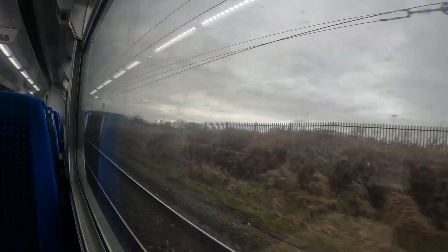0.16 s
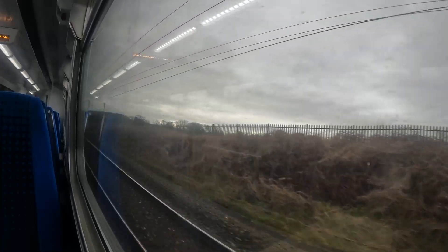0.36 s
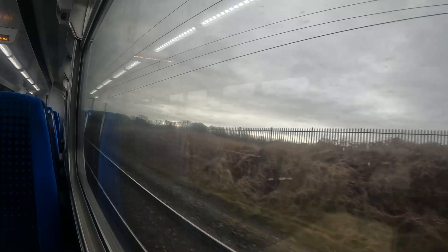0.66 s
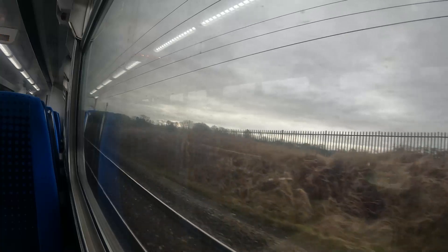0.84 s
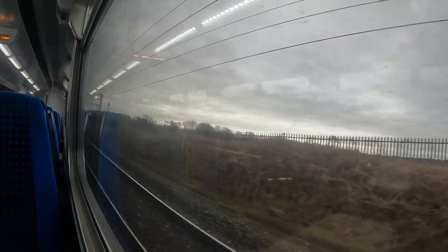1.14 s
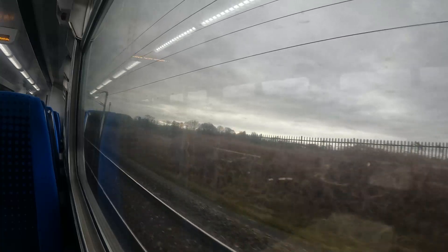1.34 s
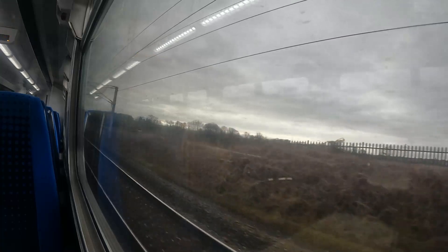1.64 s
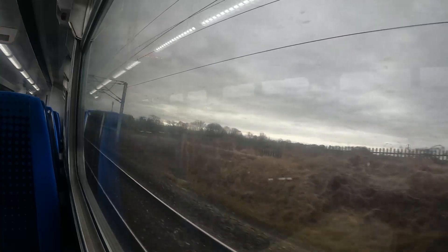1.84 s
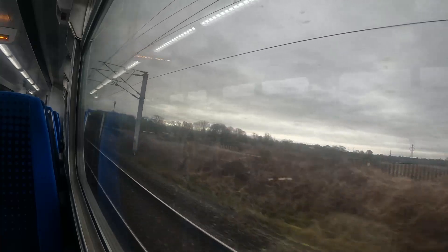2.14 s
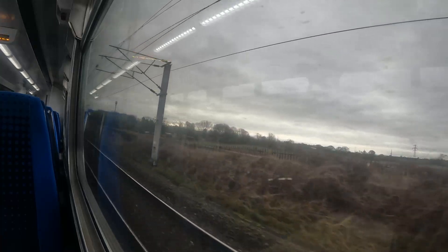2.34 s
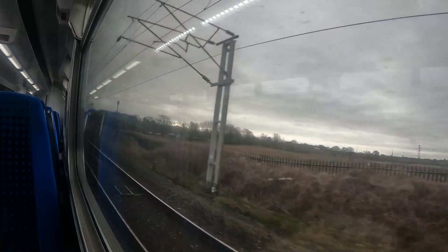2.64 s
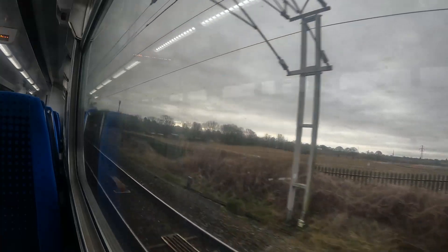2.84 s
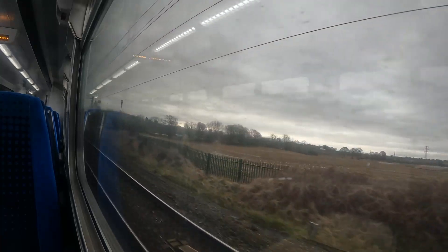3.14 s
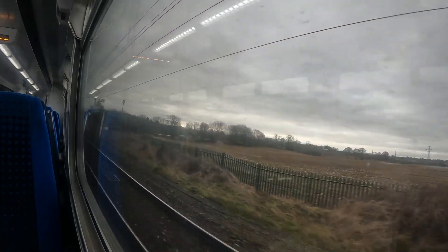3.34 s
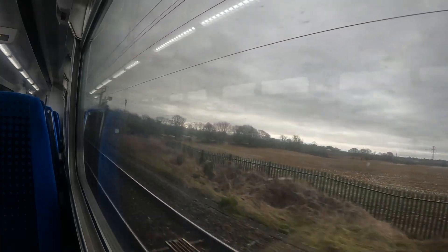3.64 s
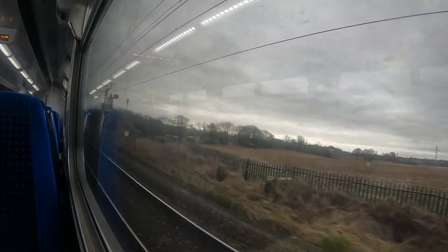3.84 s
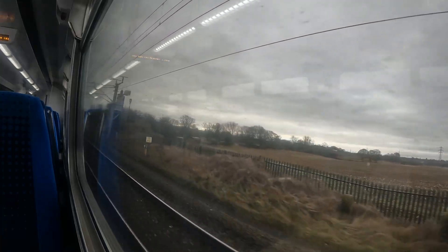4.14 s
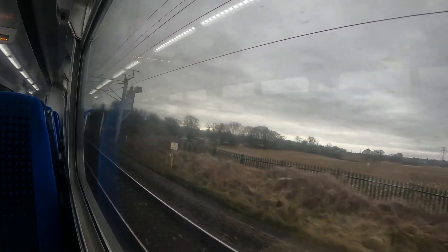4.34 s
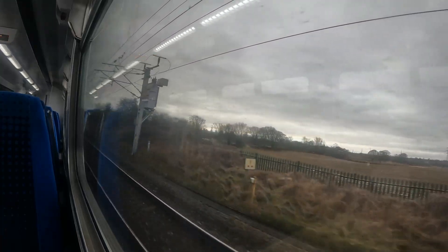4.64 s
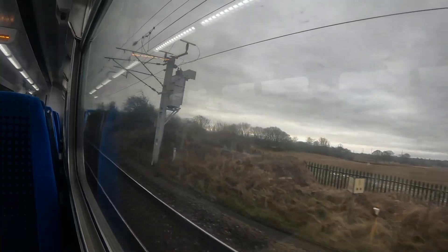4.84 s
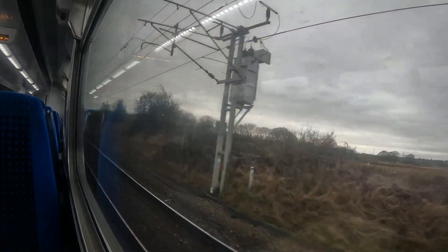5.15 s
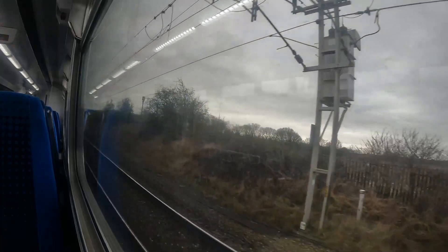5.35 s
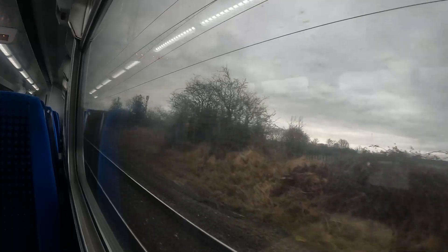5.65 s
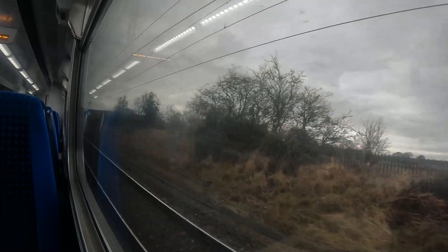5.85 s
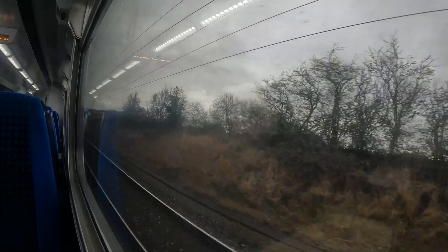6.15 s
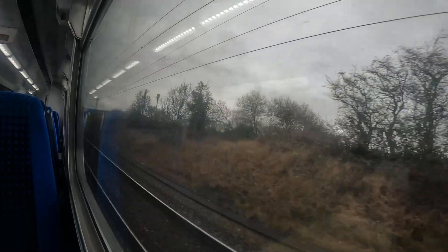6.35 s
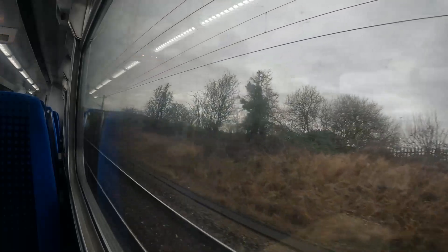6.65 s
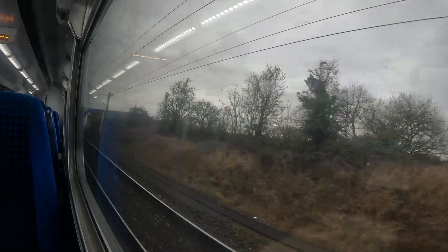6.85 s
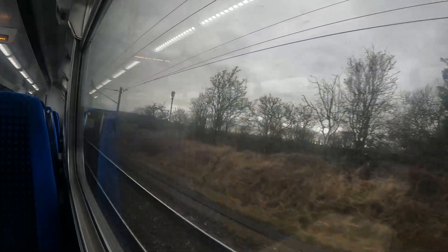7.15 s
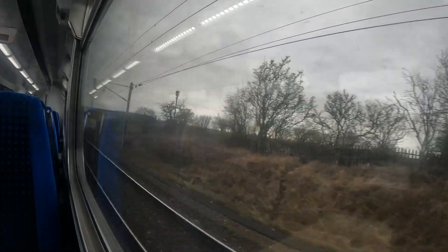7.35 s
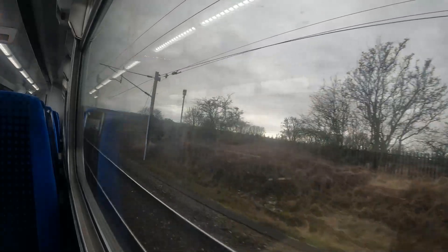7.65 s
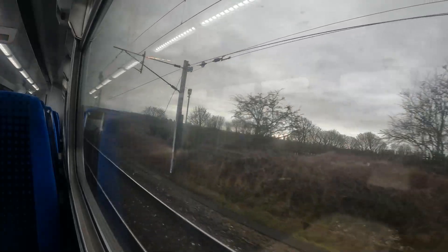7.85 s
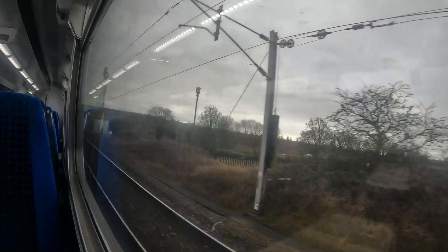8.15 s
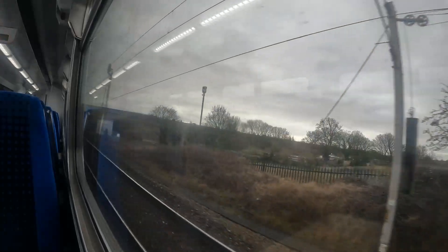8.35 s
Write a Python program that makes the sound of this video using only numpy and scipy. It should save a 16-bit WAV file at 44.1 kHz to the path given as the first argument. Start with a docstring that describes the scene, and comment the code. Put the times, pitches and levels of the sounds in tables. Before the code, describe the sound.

Interior of a moving diesel train. A loud, low, buzzing underfloor engine drone dominates, with a fast throb over dull wheel rumble, muffled rolling roar and very faint draught hiss. About halfway the revs slide down at a gear change and the drone becomes a slower, pulsing, booming beat that lasts to the end. Microphone at a passenger seat, engine nearly central, dull enclosed sound.

```python
"""Diesel railcar at speed, heard inside

The six-cylinder engine under the floor knocks the body into its low modes; at a gear change the revs fall
by a third, so the fast throb turns into a slower beat. Firings are clicks into resonators; pure engine notes
and an axle hum are sines. Filtered noise gives the rumble, roar and the hiss of draught and loose trim, which
buzzes with the drone; wavering sines are the faint tones of wheels, gears and fans."""
import sys
import numpy as np
from scipy import signal
from scipy.io import wavfile

SR = 44100
rng = np.random.default_rng(int(sys.argv[2]) if len(sys.argv) > 2 else 0)


def bounce(signal):
    """Save signal as a 16-bit WAV file at the path given by the first command-line argument."""
    frames = np.transpose(np.atleast_2d(signal))
    limited = np.clip(frames, -1, 1)
    pcm = np.round(limited * 32767).astype(np.int16)
    wavfile.write(sys.argv[1], SR, pcm)


N = 374409
T_S = np.arange(N) / SR
LEFT_RIGHT = np.array([[1], [-1]])
SPEED_GAIN_PER_S = .005026   # share of the starting speed gained every second
# engine rate in four-stroke cycles (two crank turns) per second, around the gear change
HIGH_CYCLES_HZ, LOW_CYCLES_HZ, CREEP_HZ_PER_S = 16.0979, 10.525, .0675
SHIFT_S, SHIFT_EASE_S = 4.1381, .3191


def from_db(db):
    """Decibels to gain."""
    return 10 ** (np.asarray(db) / 20)


def rms_one(x):
    """Scale to unit rms."""
    return x / np.sqrt(np.mean(x ** 2) + 1e-20)


def in_time(rows, lead_s=0):
    """Columns of a curve table, sample by sample, starting lead_s early."""
    s, *columns = np.transpose(rows)
    t_s = np.arange(-lead_s * SR, N) / SR
    return [np.interp(t_s, s, column) for column in columns]


def at_hz(points, hz):
    """A spectrum table read on a log frequency axis."""
    table = np.array(points)
    return np.interp(np.log(hz), np.log(table[:, 0] + 1), table[:, 1])


def drift(rate_hz):
    """Slow random curve of spread 1: coarse noise through a double one-pole low-pass."""
    step = 40   # samples per coarse point
    pole = np.exp(-2 * np.pi * step * max(rate_hz, .05) / SR)
    coarse = rng.standard_normal(N // step + 4002)
    slow = signal.lfilter([1], [1, -2 * pole, pole * pole], coarse)[4000:]   # drop the filter's start
    return np.interp(np.arange(N) / step, np.arange(len(slow)), rms_one(slow - slow.mean()))


def stereo(mid, side, hz):
    """Left and right from mid and side, with the width and lean of one pitch region."""
    # side against mid: hz, side_minus_mid_db
    side_share = [(20, -17), (60, -33), (110, -36.5), (200, -19), (370, -23), (690, -18.5), (1260, -5.5),
                  (2330, -8.5), (4280, -6.5), (7880, -7.5), (14500, -3)]
    # balance: hz, left_minus_right_db
    left_lean = [(20, -1.5), (60, 0.5), (200, 2.5), (370, -1), (690, 3.5), (1260, 0.1), (2330, 4),
                 (4280, -0.5), (7880, 2.5), (14500, 2.5)]
    side = from_db(at_hz(side_share, hz)) * side
    return (mid + side * LEFT_RIGHT) * from_db(at_hz(left_lean, hz) / 2 * LEFT_RIGHT)


def noise_bands(spectrum, patchy_db, tilt_db_per_oct=0, per_octave=3):
    """Stereo noise in narrow bands, each with its own level and flicker; rms 1."""
    low_hz, high_hz = spectrum[0][0], min(spectrum[-1][0], .45 * SR)
    edges_hz = np.geomspace(low_hz, high_hz, int(per_octave * np.log2(high_hz / low_hz)) + 1)
    white = rng.standard_normal((2, 2, N))   # two stereo pairs, taken in turn by neighbouring bands
    out = 0
    for k, (low, high) in enumerate(zip(edges_hz, edges_hz[1:])):
        band = signal.butter(2, [low, high], "band", fs=SR, output="sos")
        mid, side = signal.sosfilt(band, white[k % 2])
        hz = np.sqrt(low * high)
        tilt_db = tilt_db_per_oct * max(np.log2(hz / 1000), 0)   # acts above 1 kHz only
        level_db = at_hz(spectrum, hz) + patchy_db * drift(6.0) + tilt_db
        out = out + from_db(level_db) * stereo(mid, side, hz)
    return rms_one(out)


def rumble():
    """Low rumble of wheels and frame: patchy noise at a steady overall level."""
    # spectrum shape: hz, density_db_per_hz
    rumble_shape = [(6, -8.5), (14, -5), (25, -6.5), (40, -3.5), (65, -6), (85, -6), (105, -10),
                    (130, -9.5), (160, -1), (185, -12.5), (205, -11), (250, -8.5), (275, -6.5), (315, -16),
                    (380, -30)]
    return from_db(-28) * noise_bands(rumble_shape, patchy_db=1.9, per_octave=3)


def roar():
    """Rolling and air roar: noise whose level and treble tilt move slowly."""
    # spectrum shape: hz, density_db_per_hz
    roar_shape = [(230, -20.5), (310, -3.5), (389, -10.5), (448, -8.5), (485, -9.5), (601, -7.5),
                  (835, -11.5), (940, -7.5), (1180, -20), (1470, -19), (1690, -24), (2070, -26.5),
                  (2910, -29.5), (3700, -32.5), (5000, -42.5), (6000, -63.5)]
    # course: time_s, level_db, tilt_db_per_octave above 1 kHz
    rolling = [(0, -32, 0), (1.5, -32.5, 0.13), (3, -31.5, 0.1), (4.5, -32.5, -0.5), (6, -33, -.5),
               (7.2, -31.5, -2), (8.49, -32, -1.2)]
    level_db, tilt = in_time(rolling)
    return from_db(level_db) * noise_bands(roar_shape, patchy_db=1.0, tilt_db_per_oct=tilt, per_octave=4)


def tones():
    """Wheels, gears and fans: a steady sine plus a part wavering in strength and phase, spread in stereo."""
    # tones: start_s, end_s, pitch_hz at starting speed, share of the speed gain followed,
    # level_db (rms), waver_hz
    tone_rows = [(-1, 9, 224, .7, -47, 1), (-1, 2.6, 266, 1, -40, 2.5), (2.7, 3.5, 272, 0, -36, 1),
                 (6.5, 9, 265.5, 1.2, -40, 1.5), (-1, 9, 289, 1, -40, .7), (-1, 9, 328, 1.1, -42, .8),
                 (-1, 9, 362, .4, -48, 4), (2, 9, 435.5, 1.1, -47, 1), (6.8, 9, 521, .5, -48, 6),
                 (-1, 9, 612, 0, -47.5, 10), (1.1, 6.8, 910, .3, -46, 7), (2.4, 3.6, 914, 0, -45, 2),
                 (1.7, 6.9, 938, 0, -49, 9), (.1, 2.1, 1670, .8, -60, 5), (5.1, 9, 1650, .35, -56.5, 12),
                 (4.5, 9, 1690, 0, -55.5, 50), (6.2, 8.3, 1670, .75, -60, 3), (8, 9, 1745, 0, -58, 6),
                 (-1, 2.26, 2821, 0, -57.5, 1.6), (2.1, 2.4, 2810, 0, -54, .3), (-1, 2.4, 2841, 0, -63, 8),
                 (-1, 2.4, 2573, 0, -66, 4), (-1, 3, 3386, 0, -70, 4), (-1, 3, 1416, 0, -61, 4)]
    steady_hz = 3   # the slower the waver against this, the purer the tone
    out = 0
    for start_s, end_s, start_hz, follows, level_db, waver_hz in tone_rows:
        hz = start_hz * (1 + follows * SPEED_GAIN_PER_S * T_S)
        spin = np.exp(2j * np.pi * (np.cumsum(hz) / SR + rng.random()))
        wobble = spin * (drift(waver_hz) + 1j * drift(waver_hz))
        mid = rms_one(np.real(steady_hz / waver_hz * spin + wobble))
        side = rms_one(np.imag(wobble))
        fade = np.clip(np.minimum(T_S - start_s, end_s - T_S) / 0.099, 0, 1)
        out = out + from_db(level_db) * fade * stereo(mid, side, start_hz)
    return out


def hiss(drone):
    """Draught and trim: noise; the trim presses and lifts with the drone, which modulates its strength."""
    # spectrum shape: hz, density_db_per_hz
    hiss_shape = [(3200, -36.5), (4400, -8), (5000, -11.5), (5700, -2.5), (6300, -3.5), (6600, -6),
                  (6800, -10), (7600, -9.5), (8100, -22), (9200, -15.5), (9700, -20.5), (10800, -18),
                  (12000, -20.5), (13200, -26), (14000, -35.5), (14900, -49)]
    # base level: time_s, level_db
    hiss_course = [(0, -57), (.45, -57.5), (2.85, -57), (3.7, -61.5), (4.5, -58.5), (8.49, -59.5)]
    # brief bell-shaped swells: centre_s, rise_db, half_length_s
    swells = [(1.3, 1.8, 0.048), (3.08, 2.9, 0.11), (3.421, 3.9, 0.22), (3.88, 3.9, 0.056),
              (4.2, 3.1, 0.063), (4.75, 4.1, .09), (5.18, 1.7, 0.1)]
    flutter_db, flutter_hz = 1.23, 18
    buzz = 1 + 0.14 * rms_one(drone)
    swell_db = sum(rise_db * np.exp(-((T_S - s) / half_s) ** 2) for s, rise_db, half_s in swells)
    level_db = in_time(hiss_course)[0] + swell_db + flutter_db * drift(flutter_hz)
    return from_db(level_db) * rms_one(buzz * noise_bands(hiss_shape, patchy_db=0.5, per_octave=6))


def axle_hum():
    """A clean sine that climbs with the train's speed and beats against the exhaust boom."""
    # level: time_s, level_db (rms)
    hum_course = [(0, -27.5), (2, -34), (3, -31.5), (8.49, -29)]
    hz = 64.7 * (1 + SPEED_GAIN_PER_S * T_S)
    return np.sqrt(2) * from_db(in_time(hum_course)[0]) * np.sin(2 * np.pi * np.cumsum(hz) / SR)


def cycle_rate_hz(t_s):
    """Engine cycles per second: an S-curve from high to low, then a creep up with the speed."""
    low = LOW_CYCLES_HZ + CREEP_HZ_PER_S * (t_s - SHIFT_S)
    return HIGH_CYCLES_HZ + (low - HIGH_CYCLES_HZ) / (1 + np.exp((SHIFT_S - t_s) / SHIFT_EASE_S))


def firing_clicks(cycles, t_s, run_in_s):
    """One click per firing; timing and strength change for a moment just after the revs have fallen."""
    # each cylinder's blow felt in the floor: crank_deg in the 720 cycle, blow_db,
    # change_db added and delay_deg later in that moment
    firings = [(-24.5, 8, -0.2, 3.0), (100, 5, 2, -4.0), (231, 11, -1.8, 2), (377.5, 9.97, -0.3, -4.0),
               (482.5, 7.97, 0.5, -3.0), (658, 7.35, 2.2, -4.0)]
    # engine load: time_s, load_db
    load_course = [(0, 0.7), (3, -0.5), (3.4, -1.5), (3.62, -0.3), (3.9, -1.2), (4.15, -1), (4.42, -1.6),
                   (4.7, -2.5), (4.95, -3.3), (5.3, -1.7), (6, -0.8), (8.49, -1.8)]
    moment_s, moment_half_s = 5.2, 0.36   # middle, half length
    load_db, = in_time(load_course, lead_s=run_in_s)
    moment = np.exp(-((t_s - moment_s) / moment_half_s) ** 2)
    clicks = np.full(len(cycles), 1e-18)
    for crank_deg, blow_db, change_db, delay_deg in firings:
        at = np.flatnonzero(np.diff(np.floor(cycles - (crank_deg + delay_deg * moment) / 720)))
        scatter_db = .3 * rng.standard_normal(len(at))
        clicks[at] += from_db(blow_db + change_db * moment[at] + load_db[at] + scatter_db)
    return clicks


def body_drone(clicks):
    """Every click rings all floor and cabin modes as decaying sines."""
    # modes: pitch_hz, level_db, t60_s, sign at the seat
    body_modes = [(68.7, -50.5, 0.6, 1), (82.2, -56, 0.6, 1), (94.2, -44, 0.34, -1), (108, -51.5, 0.18, -1),
                  (119.4, -40.5, 1, 1), (133.9, -42.5, 0.32, 1), (140.94, -22, 0.23, 1),
                  (142.99, -28.5, 0.78, -1), (147.74, -19.5, 0.17, -1), (152.62, -24.5, 0.35, 1),
                  (159.47, -26.5, 0.31, -1), (169, -45, 0.26, 1), (176.8, -44, 0.53, 1),
                  (193.9, -34.5, 0.28, 1), (223.6, -46, 0.36, 1), (240.14, -53, 1, 1),
                  (274.8, -59, 0.73, 1)]
    drone = 0
    for hz, level_db, t60_s, sign in body_modes:
        r, w = from_db(-60 / (t60_s * SR)), 2 * np.pi * hz / SR
        ring = signal.lfilter([0, np.sin(w)], [1, -2 * r * np.cos(w), r * r], clicks)
        drone = drone + np.sign(sign) * from_db(level_db) * ring
    # the drone carries nothing deeper than about 45 Hz
    return signal.sosfilt(signal.butter(2, 45, "high", fs=SR, output="sos"), drone)


def engine_notes(turn, rate_hz):
    """Sines locked to the crank angle, swelling as the revs pass cabin resonances."""
    # note levels (rms): cycles_hz, shake_db once per turn, boom_db of the exhaust once per firing,
    # growl_db a fifth above the boom, octave_db of the boom
    note_levels = [(10.7, -23.5, -36, -35, -30.5), (10.9, -25, -28.5, -36, -23.5),
                   (11.15, -20.5, -31.5, -38.5, -21), (11.9, -31.5, -20.5, -27.5, -30.5),
                   (12.35, -36, -28.5, -44, -14.5), (13, -41.5, -27, -41.5, -32),
                   (14.6, -33.5, -40.5, -46.5, -22), (16.1, -35.5, -49, -48.5, -52)]
    # multiples of the crank speed that sing out near a cabin resonance at 155 Hz
    sing_multiples = [7, 5.5]
    # their peaks: level_db (rms), peak_cycles_hz, half_width_cycles_hz
    sing_peaks = [(-23, 11.4, 0.33), (-24, 13.9, 0.38)]
    at_rate, *levels = np.transpose(note_levels)
    shake, boom, growl, octave = [from_db(np.interp(rate_hz, at_rate, db)) for db in levels]
    notes = shake * np.cos(turn) + boom * np.sin(3 * turn)
    notes = notes - octave * np.cos(6 * turn) + growl * np.sin(4.5 * turn)
    for multiple, (level_db, peak_hz, half_hz) in zip(sing_multiples, sing_peaks):
        swell = from_db(level_db) * np.exp(-((rate_hz - peak_hz) / half_hz) ** 2)
        notes = notes + swell * np.sin(multiple * turn)
    return np.sqrt(2) * notes


def engine():
    """Body drone and pure notes share one crank, run in beforehand so the modes already ring."""
    run_in_s = 2
    t_s = np.arange(-run_in_s * SR, N) / SR
    rate_hz = cycle_rate_hz(t_s)
    cycles = np.cumsum(rate_hz) / SR
    cycles = cycles - cycles[run_in_s * SR]
    drone = body_drone(firing_clicks(cycles, t_s, run_in_s))
    turn = 4 * np.pi * cycles[-N:]   # crank angle, rad
    return drone[-N:], engine_notes(turn, rate_hz[-N:])


def engine_stereo(low):
    """Engine near the middle; left panels ring in two bands, the deepest shake is stronger on the right."""
    # panels: pitch_hz, width_hz, side_minus_mid_db at high revs, loss_db per cycle/s below them
    panels = [(73, 25, -25.5, 1.5), (168.6, 14, -19, 2)]
    deep_hz, deep_db, side_db = 32, -14, -38
    slower_hz = HIGH_CYCLES_HZ - cycle_rate_hz(T_S)
    deep = signal.sosfiltfilt(signal.butter(2, deep_hz, fs=SR, output="sos"), low)
    side = from_db(side_db) * low - from_db(deep_db) * deep
    for hz, width_hz, level_db, loss_db in panels:
        ring = signal.lfilter(*signal.iirpeak(hz, hz / width_hz, fs=SR), low)
        side = side + from_db(level_db - loss_db * slower_hz) * ring
    return low + side * LEFT_RIGHT


def scene():
    """Engine and axle hum near the middle; noises and tones around them."""
    drone, notes = engine()
    background = rumble() + roar() + tones() + hiss(drone)
    return background + engine_stereo(drone + notes + axle_hum())


def record(dry):
    """Peaks are rounded, the top is cut steeply."""
    peak_top, cutoff_hz = 0.7, 15000   # soft ceiling, stopband edge
    rounded = dry / (1 + (dry / peak_top) ** 4) ** .25
    return signal.sosfilt(signal.cheby2(12, 70, cutoff_hz, fs=SR, output="sos"), rounded)


dry = scene()
out = record(dry)
bounce(out)
```